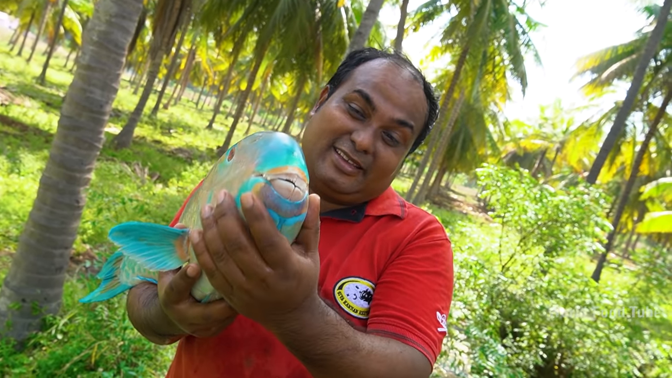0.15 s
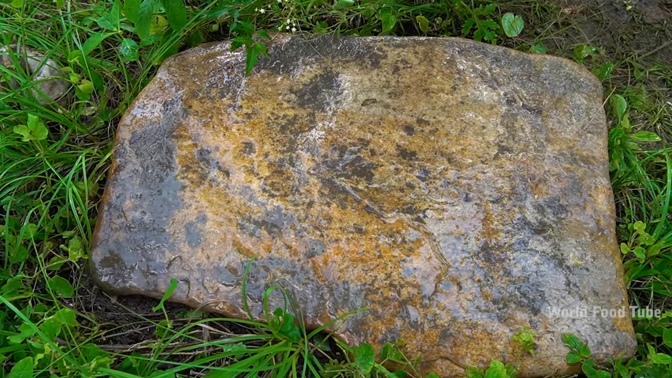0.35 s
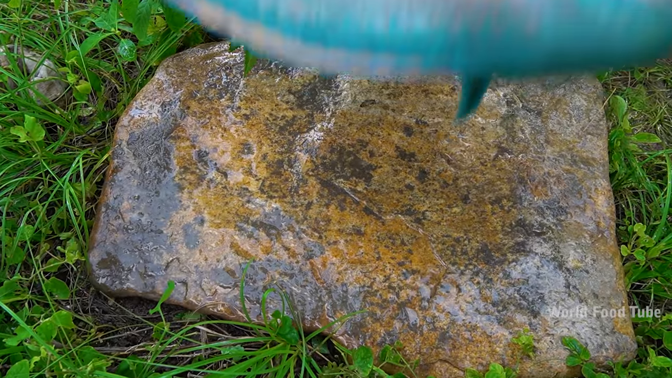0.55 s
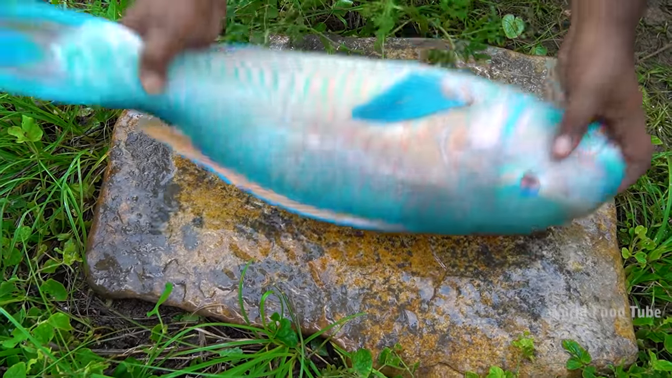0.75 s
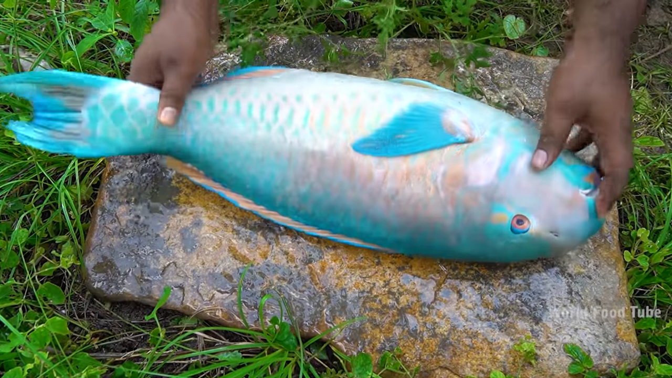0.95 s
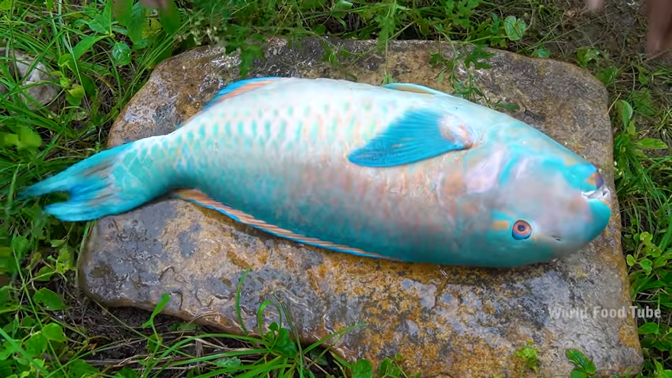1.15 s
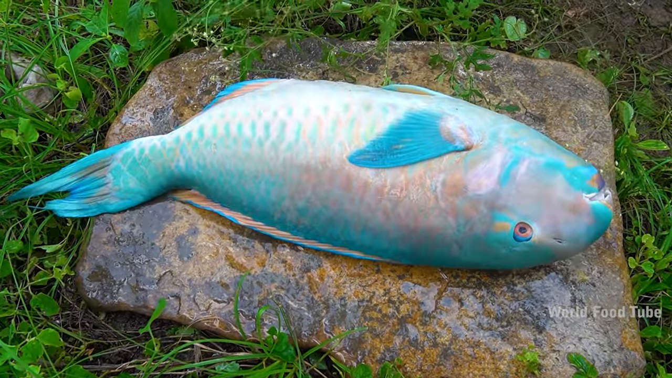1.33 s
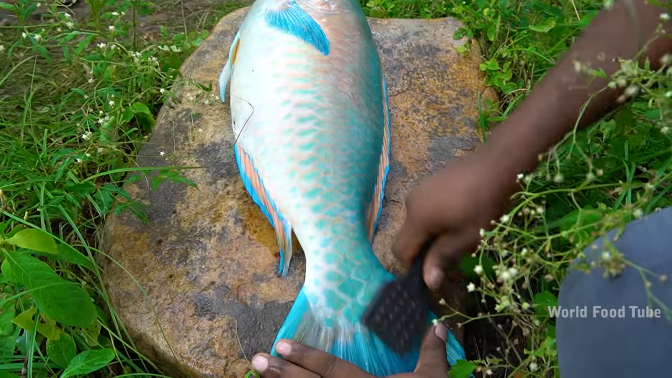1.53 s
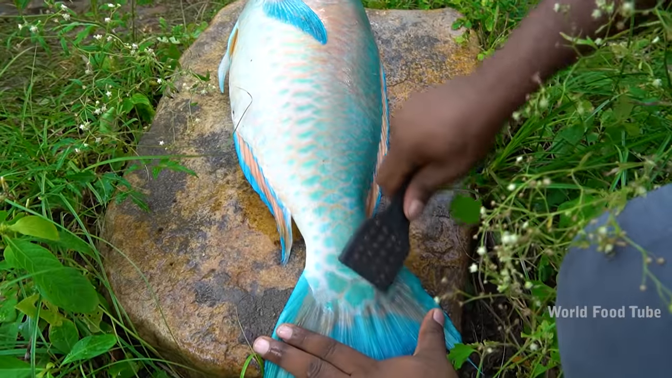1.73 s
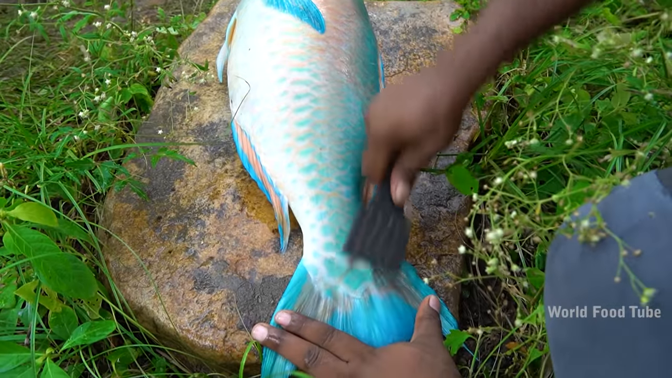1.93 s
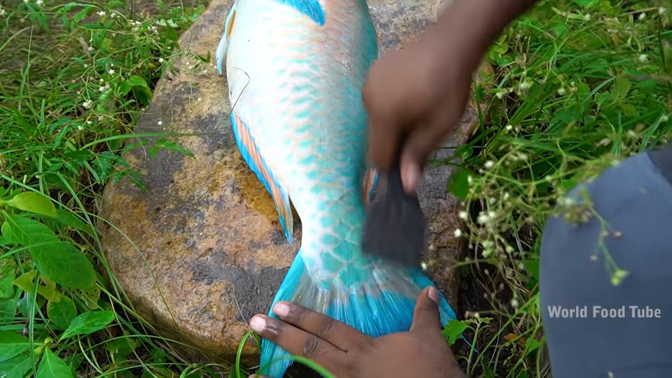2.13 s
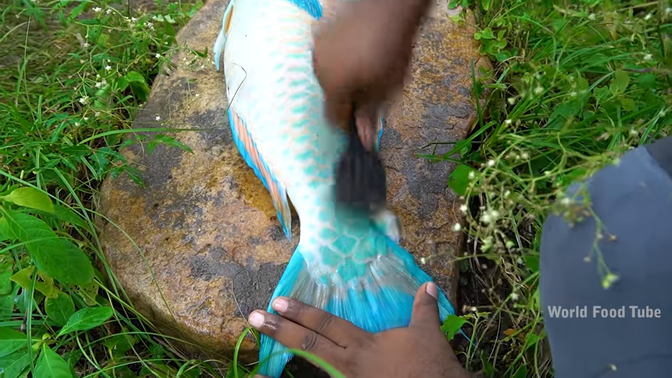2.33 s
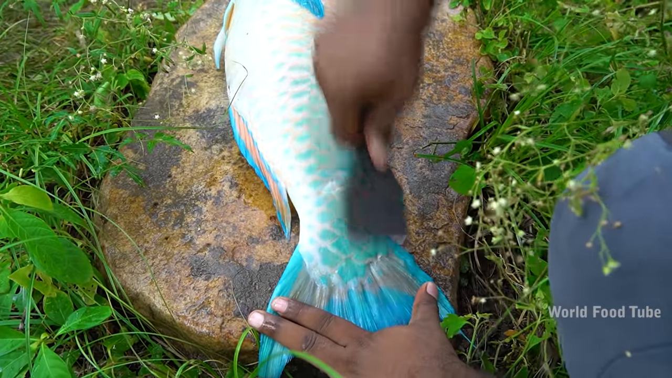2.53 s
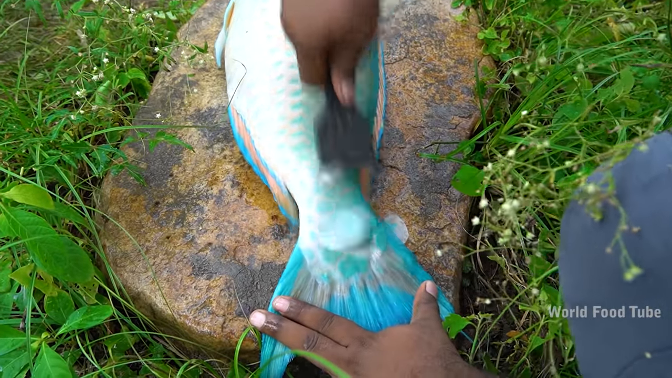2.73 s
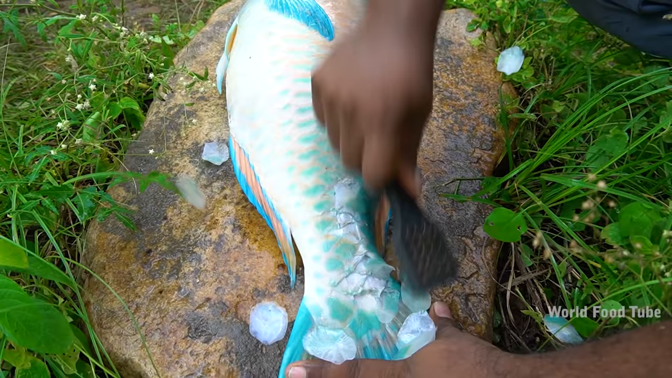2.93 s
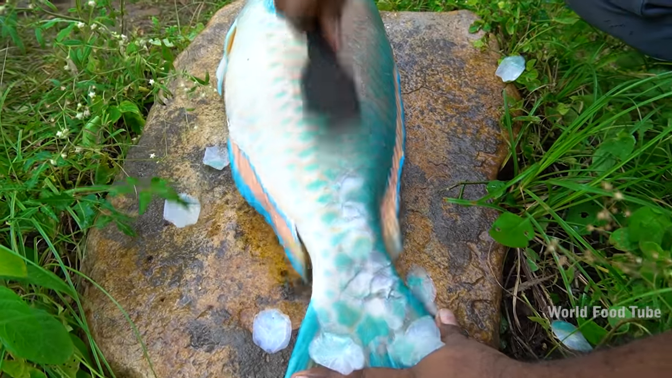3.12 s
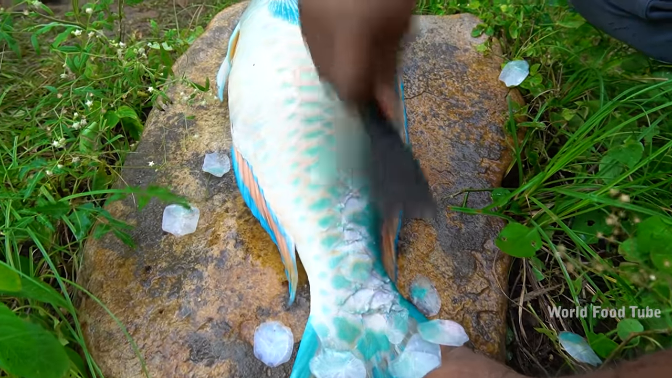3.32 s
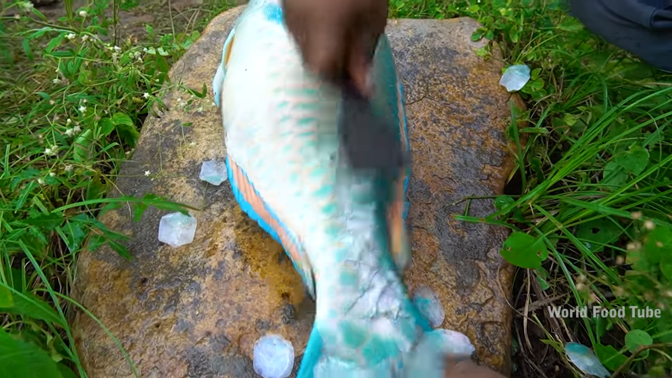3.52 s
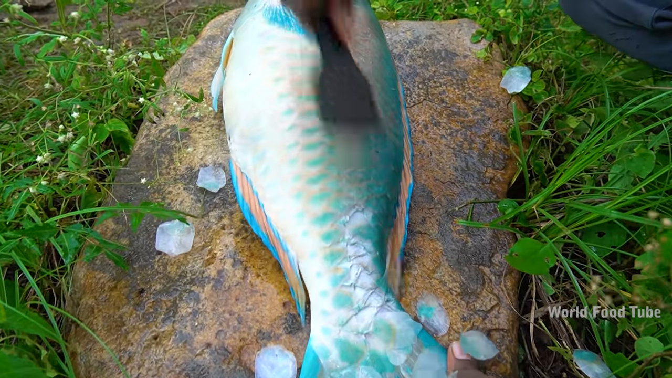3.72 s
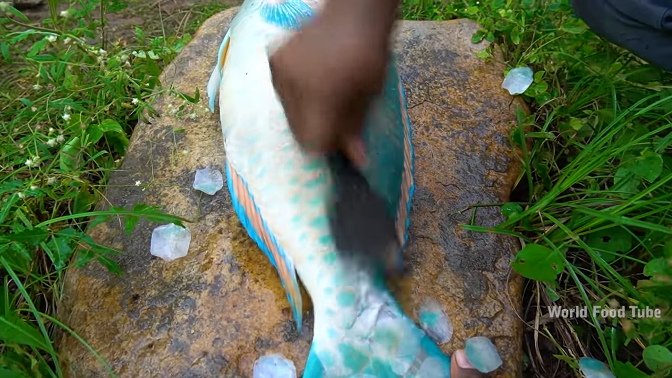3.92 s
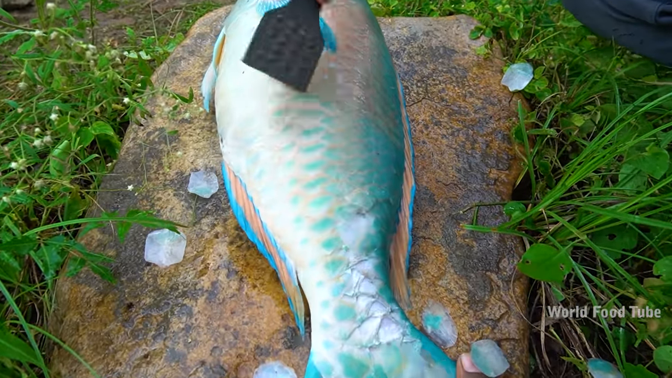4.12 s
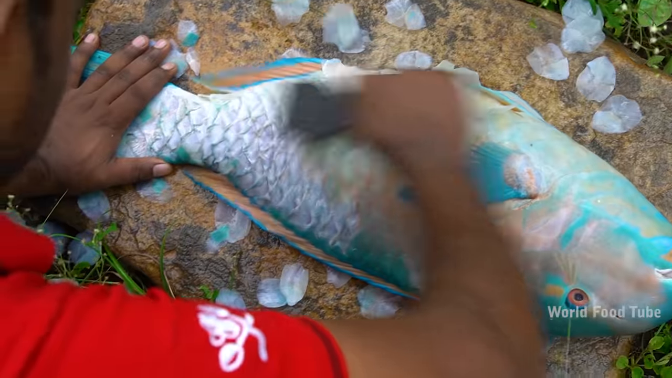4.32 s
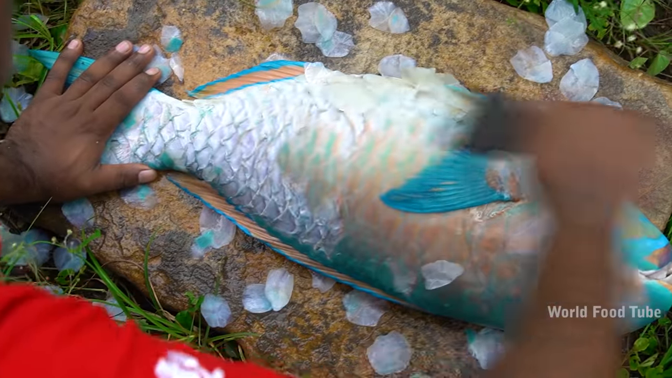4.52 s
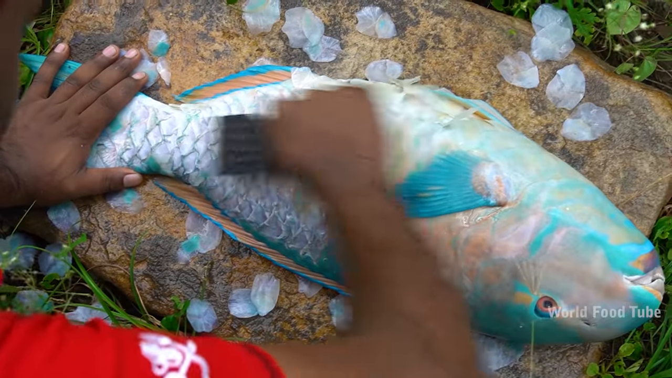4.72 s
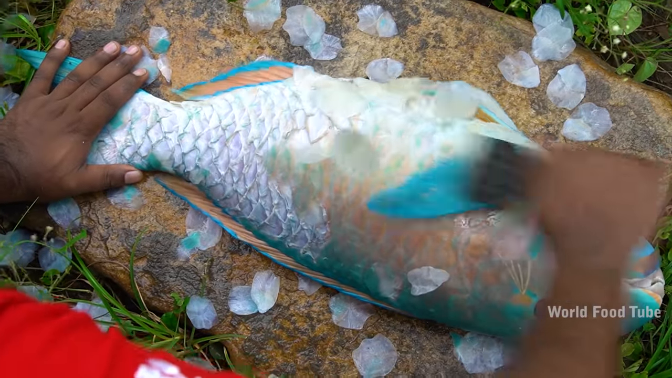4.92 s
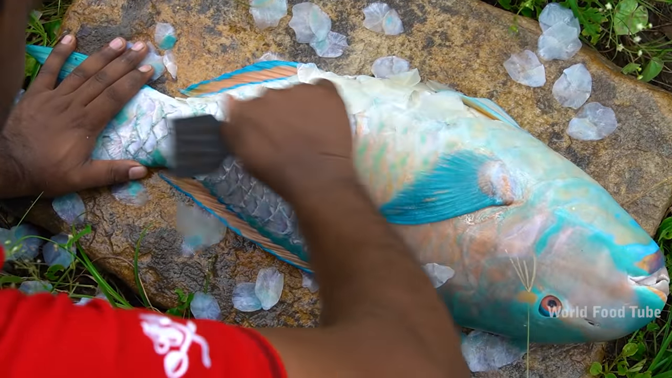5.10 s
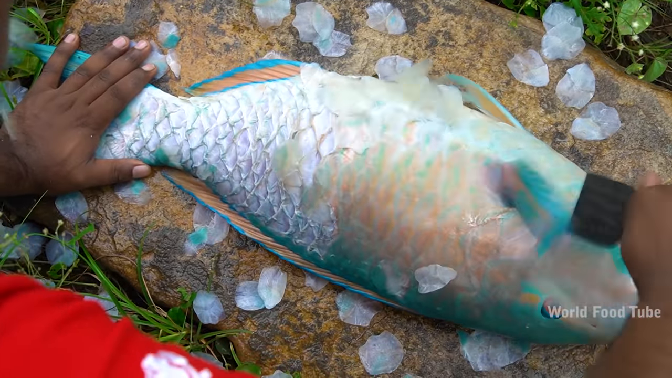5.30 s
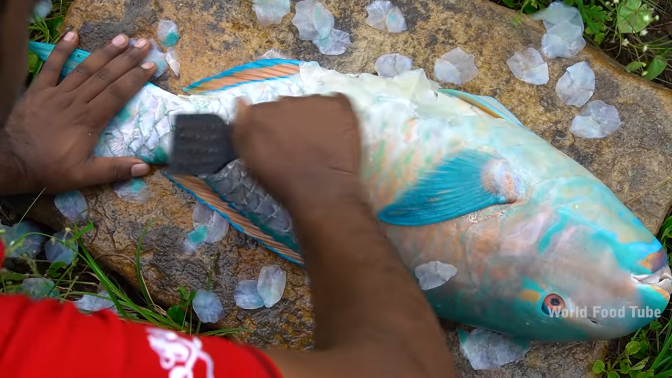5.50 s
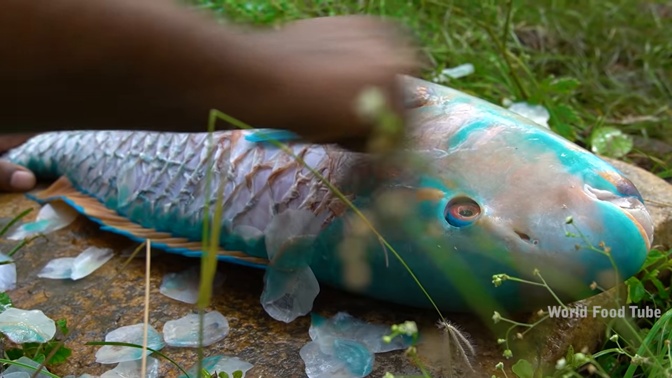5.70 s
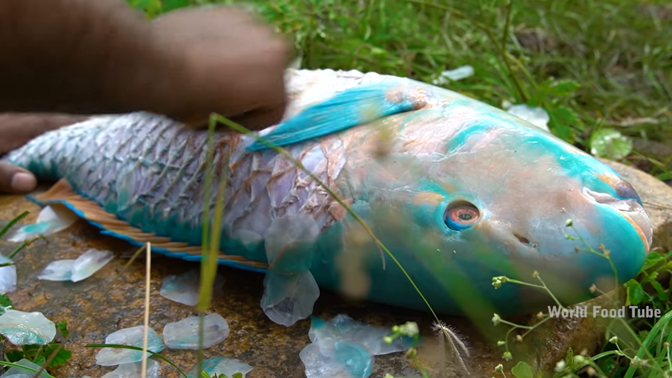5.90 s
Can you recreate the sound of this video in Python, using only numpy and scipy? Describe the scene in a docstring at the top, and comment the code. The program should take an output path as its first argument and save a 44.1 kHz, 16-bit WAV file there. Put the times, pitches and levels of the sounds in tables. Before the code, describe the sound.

Close, dry stereo sound of fish scaling in open air. After a quiet start with hissing wet rustle and a brief crisp contact on stone, rasping strokes follow at regular intervals, crunchy and bright, with wet fizz, lower fleshy scrape and hard plate-like ticks of big scales snapping loose. Small squeaks and dull body thuds come through; behind are leaves, a thin insect tone and faint gliding bird whistles.

```python
"""The soft wash of a palm grove is heard first, then a wet rustle as a large fish is lowered onto a stone slab.
A toothed metal scraper then scales the fish in strokes, each a dense run of tiny noise bursts that ring like thin plates.
Single sharp ticks are ringing bursts too, most of them big scales that snap loose or land;
short narrow resonances are scales that sing or the dull body. Behind the work, coloured noise makes the grove
and its low rumble, narrow noise makes thin far tones, and gliding sines make a bird's whistles."""
import sys
import numpy as np
from scipy import signal
from scipy.io import wavfile
from scipy.ndimage import uniform_filter1d, minimum_filter1d

SR = 44100
rng = np.random.default_rng(int(sys.argv[2]) if len(sys.argv) > 2 else 0)


def inscribe(sig):
    """Save sig as 16-bit PCM at rate SR to the path in sys.argv[1].

    A 1-D sig is mono; a 2-D sig holds one channel per row.
    Samples are clipped to [-1, 1] before scaling.
    """
    pcm = np.round(np.clip(np.atleast_2d(sig).T, -1, 1) * 32767)
    wavfile.write(sys.argv[1], SR, pcm.astype(np.int16))


N = 266893  # length of the scene in samples
HZ = np.fft.rfftfreq(2048, 1 / SR)  # frequencies at which every sound colour is set

# Strokes of the scraper; the first is the fish sliding onto the slab.
# Each row: start in seconds, dig-in in seconds, bite in seconds, run-out in seconds, stroke level in dB,
# run-out compared with bite in dB, first and last pitch of the bending scales in Hz,
# deepest push in seconds after the start, flesh at that push in dB, fizz halfway along in dB, closing thud in dB.
STROKES = [ (0.860, .004, 0.0078, 0.014, -20.5, -8, 2280, 3570, 0.0057, -5.5, -12.5, -45.5),
           (1.610, 0.021, 0.039, .012, -21.5, 1.5, 1770, 3930, .025, -17.5, -15.5, -72),
           (1.945, 0.023, 0.08, 0.04, -23.5, 3, 1970, 4140, 0.11, -6, -10, -70),
           (2.308, 0.022, 0.091, .062, -18.5, -7, 2570, 2320, 0.098, -8.5, -10, -73),
           (2.696, 0.03, 0.059, 0.1, -18, -18.5, 1640, 3000, 0.027, -8, -14.5, -78),
           (3.051, 0.048, 0.06, 0.085, -21.5, -5, 4570, 4270, 0.082, -9.5, -11.5, -66),
           (3.489, 0.06, 0.016, .112, -19, -10, 3500, 2230, .095, -12.5, -10.5, -68),
           (3.953, 0.035, 0.039, 0.039, -16.5, -9, 3600, 1900, 0.043, -17, -12.5, -67),
           (4.378, 0.039, 0.033, 0.027, -17, -7, 2100, 3280, 0.046, -6.5, -12, -48),
           (4.789, .034, 0.079, 0.0136, -17, -4.5, 2800, 2140, 0.113, -5, -12.5, -51.5),
           (5.214, 0.026, 0.079, 0.035, -20, -7, 2280, 2520, 0.038, -5, -12.5, -51),
           (5.670, 0.096, 0.011, 0.035, -22, -3, 3700, 2930, .128, -5.5, -14.5, -41), ]
# Single sharp ticks: a few in the rustle and between strokes, most of them big scales that snap loose or land.
# Each row: time in seconds, peak in dB before a small common boost, ring pitch in Hz, brightness in dB before scaling.
SNAPS = [(0.57, -28, 2170, -6), (0.713, -27, 1410, -10), (0.8683, -6, 5640, -15), (1.2116, -16, 1360, -27),
         (1.6288, -14, 1700, -40), (1.711, -10.5, 1730, -14.5), (1.803, -18.5, 1300, -15),
         (2.017, 1, 3430, -15), (2.05, -10.5, 2770, -11), (2.0947, -8.5, 4480, -11), (2.139, -21, 4700, -1),
         (2.182, -29, 1250, -17), (2.3114, -14.5, 1860, -48), (2.3559, -9, 2330, -37),
         (2.4422, -8.5, 7320, -15), (2.4556, -9, 4140, -17), (2.472, -3.5, 2460, -12.5),
         (2.6766, -17.5, 1870, -52), (2.7209, -9.5, 1520, -43), (2.7695, -10, 4840, -21),
         (2.7842, -7, 2130, -23), (2.83, -9.5, 2580, -26), (2.8453, -12.5, 2560, -12),
         (2.8733, -6.5, 2700, -20.5), (3.0014, -27, 1310, -26), (3.0623, -19.5, 2110, -17.5),
         (3.089, -13, 5130, -12), (3.1033, -3.5, 3600, -20), (3.1308, -7, 2280, -9),
         (3.179, -0.5, 2130, -12), (3.2676, -26, 5130, -18), (3.501, -22, 1630, -28),
         (3.5339, -8, 3270, -17), (3.5696, -8.5, 2120, -24), (3.5891, -7.5, 2100, -23),
         (3.6029, -8, 2190, -16.5), (3.693, -1, 3400, -11), (3.9713, -13.5, 4630, -24),
         (4.0423, -6.5, 2200, -30), (4.0524, 0, 2010, -21), (4.0841, -6.5, 1810, -24),
         (4.1122, -15.5, 1960, -12), (4.157, -24.5, 2040, -20), (4.413, -8, 2360, -20),
         (4.4704, -10, 2880, -33), (4.911, -10.5, 1770, -22), (5.182, -29, 1240, -19),
         (5.202, -24.5, 1410, -27), (5.2458, -2, 2260, -30), (5.3203, -9, 2680, -16),
         (5.3497, -15.5, 1370, -19), (5.432, -26, 1420, 3), (5.458, -7, 10500, -9),
         (5.9368, -11.5, 1620, -15.5)]
# Sound colour of the scraping. Each row: frequency in Hz, strength in dB per Hz.
RASP = [(150, -52), (250, -26.5), (298, -26), (557, -17), (816, -12.5), (1260, -7.5), (1450, -8.5),
        (1820, -6), (2050, -2.5), (3840, -2), (5250, -4.5), (5930, -8.5), (15200, -16), (16000, -46)]
# Stereo width of the scraping. Each row: frequency in Hz, side compared with middle in dB.
WIDTH = [(200, -10), (1000, -39), (2000, -16.5), (4000, -7), (8000, -7), (15000, -6)]


def amp(db):
    """Turns decibels into a gain."""
    return 10 ** (np.asarray(db) / 20)


def unit(x):
    """Scales a sound to an rms (average strength) of one."""
    return x / np.sqrt(np.mean(x ** 2) + 1e-20)


def ramp(t, start, length):
    """Goes evenly from zero to one."""
    return np.clip((t - start) / length, 0, 1)


def read(points, hz):
    """Reads a curve between its points on a log-frequency axis."""
    f, value = np.transpose(points)
    return np.interp(np.log(hz + 1), np.log(f + 1), value)


def add(mix, s, sound):
    """Mixes a sound in at time s in seconds."""
    part = mix[:, max(round(s * SR), 0):][:, :sound.shape[-1]]
    part += sound[..., :part.shape[1]]


def colour(x, db):
    """Filters a sound with the gains db at the frequencies HZ, with no sound ahead of its cause."""
    log_gain = np.log(amp(np.maximum(db, db.max() - 100)))
    both_halves = np.r_[log_gain, log_gain[-2:0:-1]]
    # the Hilbert transform gives the minimum phase that belongs to these gains
    spectrum = np.exp(np.conj(signal.hilbert(both_halves)))
    taps = np.fft.ifft(spectrum).real
    return signal.fftconvolve(x, taps[:len(HZ)])[:len(x)]


def band(x, lo_hz, hi_hz):
    """Keeps only a band of frequencies, with steep edges."""
    edges = [lo_hz, min(hi_hz, .49 * SR)]
    return signal.sosfilt(signal.butter(4, edges, "band", fs=SR, output="sos"), x)


def resonate(x, hz, width):
    """A resonance with a gain of one at its pitch, which may glide; width in Hz."""
    turn = np.exp(2j * np.pi * np.cumsum(hz * np.ones(x.shape[-1])) / SR)
    r = np.exp(-np.pi * width / SR)
    # shift the pitch down to zero, smooth there, and shift back up
    smooth = signal.lfilter([1 - r], [1, -r], x / turn + 1e-18)
    return 2 * (turn * smooth).real


def narrow(n, hz, width):
    """A fuzzy tone of rms one: n samples of noise through the same resonance twice."""
    noise = rng.standard_normal(n + SR // 10)  # the extra start lets the resonance build up
    return unit(resonate(resonate(noise, hz, width), hz, width)[-n:])


def rings(table, width):
    """Short swells of one resonance each, from rows of (s, rms dB, pitch Hz, length s)."""
    out = np.zeros((2, N))
    for s, db, hz, length in table:
        n = round(length * SR)
        swell = signal.windows.tukey(n, .8) * narrow(n, hz, width)
        add(out, s, amp(db) * unit(swell))
    return out


def spread(pair, db, width):
    """Colours a middle and a side signal and turns them into left and right."""
    mid = colour(pair[0], db)
    side = colour(pair[1], db + read(width, HZ))
    return np.array([mid + side, mid - side])


def strokes():
    """The scraper ploughs through the scales; the flesh answers lower down and wet slime fizzes on top."""
    touch_db = -23  # first touch of the teeth, compared with the bite
    ease_s = 0.0054  # the hand eases from the bite into the run-out
    lift_s, lift_db = .011, -20.5  # the scraper leaves the skin
    # flung slime patters on, thinner and brighter
    spray_s, spray_fade_db, spray_fizz_db = 0.064, -14.5, 3.5
    fizz_rise_db = 11.5  # slime gathers on the teeth along the stroke
    fizz_keep = 0.24  # share of the change in force that the fizz does not follow in the run-out
    push_s, flesh_rest_db = 0.015, -8.5  # half width of the deepest push; change in the flesh away from it
    loose_db = 8  # level of the smaller loose scales

    out = np.zeros((2, N))
    grains = crackle(per_s=2000, size_db=4.0, decay=0.00091, ring_db=20.5, sharpness=13.3)
    slime = unit(spread(rng.standard_normal((2, N)), read(RASP, HZ), WIDTH))
    rasp = unit(band(grains, 1666, 7800))
    flesh = unit(band(grains, 396, 1360))
    fizz = unit(band(grains + amp(-11.5) * slime, 6620, 20800))
    pops = amp(loose_db) * loose_scales()
    for start, dig, bite, run_out, db, light_db, first_hz, last_hz, push, flesh_db, fizz_db, _ in STROKES:
        ease = dig + bite
        lift = ease + run_out
        t = np.arange(0, lift + lift_s + spray_s, 1 / SR)
        at = round(start * SR) + np.arange(len(t))

        # force: dig in, bite, run out, lift off, spray
        lifted = ramp(t, lift, lift_s)
        eased_db = light_db * ramp(t, ease, ease_s)
        digging_db = touch_db * (1 - ramp(t, 0, dig))
        spray_db = spray_fade_db * ramp(t, lift + lift_s, spray_s)
        force_db = digging_db + eased_db + lift_db * lifted + spray_db

        # the pitch of the bending scales glides along the stroke
        along = ramp(t, 0, lift)
        hz = first_hz * (last_hz / first_hz) ** along
        bending = unit(rasp[:, at] + amp(1.0) * resonate(rasp[:, at], hz, 840))

        away_from_push = 1 - np.exp(-((t - push) / push_s) ** 2)
        give = amp(flesh_db + flesh_rest_db * away_from_push)
        wet = amp(fizz_db + fizz_rise_db * (along - .5) - fizz_keep * eased_db + spray_fizz_db * lifted)
        sound = amp(-2.0) * bending + pops[:, at] + give * flesh[:, at] + wet * fizz[:, at]
        add(out, start, amp(db + force_db) * sound * signal.windows.tukey(len(at), .04))
    return out


def crackle(per_s, size_db, decay, ring_db, sharpness, count=36):
    """A dense run of cracks from scales of many sizes, evened to a steady strength."""
    out = np.zeros((2, N))
    for hz in np.geomspace(1500, 6000, count):
        happens = rng.random(N) < per_s / count / SR
        clicks = happens * amp(size_db * np.minimum(rng.exponential(1, N), 4))
        grain = crack(hz, decay * rng.uniform(0.87, 2.7), ring_db, sharpness, tilt_db=1.8 * rng.standard_normal())
        out += signal.oaconvolve(clicks[None], unit(grain), axes=1)[:, :N]
    power = abs(uniform_filter1d((out ** 2).mean(0), size=700))
    return out / np.sqrt(power + 1e-9)


def crack(hz, decay, ring_db, sharpness, tilt_db):
    """A brief noise burst rings a thin plate, as when one scale lets go; decay in seconds."""
    t = np.arange(1024) / SR
    envelope = np.exp(-t / decay) * (1 - np.exp(-t / 0.00025))
    burst = rng.standard_normal((2, len(t))) * envelope
    off_pitch = sharpness * (HZ / hz - hz / (HZ + 1))
    ring = 10 * np.log10(1 + amp(ring_db) ** 2 / (1 + off_pitch ** 2))
    treble = tilt_db * read([(3500, 0.12), (9000, 0.88)], HZ)
    return spread(burst, read(RASP, HZ) + ring + treble, WIDTH)


def loose_scales():
    """Smaller scales pop at random under the scraper, with peaks spread over 6 dB."""
    loose_per_s = 35
    out = np.zeros((2, N))
    for when, pitch, size in rng.random((round(loose_per_s * N / SR), 3)):
        pop = crack(1700 * 3 ** pitch, .0003, ring_db=19, sharpness=7.8, tilt_db=6)
        add(out, when * N / SR, amp(-6 * size) * pop / abs(pop).max())
    return out


def skips():
    """The teeth skip after a snap: a gain that dips the strokes just after each tick, more after a louder one."""
    skip_db = -4.5  # depth after a tick listed at 0 dB
    skip_after_s, skip_s = 0.015, 0.0097  # delay and half width of the dip
    after = np.arange(0, skip_after_s + 3 * skip_s, 1 / SR)
    dip = np.exp(-((after - skip_after_s) / skip_s) ** 2)
    dips = np.zeros((1, N))
    for s, db, *_ in SNAPS:
        add(dips, s, amp(db / 2) * dip)
    return amp(skip_db * dips)


def snaps():
    """Single sharp ticks, most of them big scales breaking free; the higher the ring, the shorter the crack."""
    out = np.zeros((2, N))
    for s, db, hz, bright_db in SNAPS:
        decay = 0.0023 * (2500 / hz) ** 0.67
        snap = crack(hz, decay, ring_db=12, sharpness=4.2, tilt_db=0.83 * (bright_db + 22.5))
        add(out, s + .0008, amp(db + 1.0) * snap / abs(snap).max())
    return out


def squeaks():
    """Scales that stick and sing under a tooth, each a short narrow resonance."""
    # Each row: start in seconds, rms level in dB, pitch in Hz, length in seconds.
    squeak_rows = [(1.644, -16, 1750, 0.0095), (1.678, -22.5, 4000, 0.015), (1.958, -18, 1740, 0.017),
                   (2.68, -31.5, 1790, .006), (2.713, -27, 1560, .025), (3.146, -25.5, 4940, .014),
                   (3.19, -36, 2120, 0.057), (3.212, -25, 4080, 0.015), (3.578, -33, 2090, 0.044),
                   (3.703, -39, 3880, 0.022), (5.3, -21.5, 2230, .018), (5.693, -35, 3700, .02)]
    return rings(squeak_rows, width=280)


def surroundings(x, near_t60, far_t60, near_db, far_db):
    """Slab, ground and the worker's body scatter the sound at once; the trunks add a faint tail."""
    t = np.arange(SR // 2) / SR
    taps = rng.standard_normal((2, len(t))) * (rng.random((2, len(t))) < .15) * (t > .002)
    echo = 0
    for t60, db in ((near_t60, near_db), (far_t60, far_db)):
        tail = taps * amp(-60 * t / t60)  # t60: seconds to fade by 60 dB
        echo = echo + amp(db) * tail / np.linalg.norm(tail[0])
    return x + signal.fftconvolve(x, echo, axes=1)[:, :N]


def body_knocks():
    """The fish's body resonates dully, jolted late in each stroke and bumped between or after strokes."""
    # Bumps outside the strokes. Each row: start in seconds, rms level in dB, pitch in Hz, length in seconds.
    bump_rows = [(2.998, -63, 110, 0.021), (5.924, -43.5, 224, 0.032)]
    return rings(thuds() + bump_rows, width=135)


def thuds():
    """Each stroke jolts the body just before the scraper lifts: rows of (s, rms dB, pitch Hz, length s)."""
    thud_hz, longest_s, lead_s = 229, .11, .085
    rows = []
    for start, dig, bite, run_out, *_, db in STROKES:
        lift = dig + bite + run_out
        rows.append((start + max(lift - lead_s, 0), db, thud_hz, min(longest_s, lift)))
    return rows


def rustle():
    """Wet hands and grass rustle as the fish is lowered: fine ticks roughen a hiss that fades to a remainder."""
    start_s, peak_s = 0.393, 0.79
    peak_db, rest_db = -42.5, -61
    swell_db_per_s, fade_db_per_s = 24, 41
    flutter_db = 2  # the rustle comes in clumps of some 20 ms

    ticks = (rng.random(N) < 500 / SR) * amp(5.9 * np.minimum(rng.exponential(1, N), 4))
    tick_tails = signal.lfilter([1], [1, -np.exp(-1 / (0.00083 * SR))], ticks)
    hiss = rng.standard_normal((2, N)) * (1 + 0.48 * tick_tails)
    hiss_db = read([(800, -16), (3000, -5), (6000, 0), (10000, -2.5), (16000, -4.0)], HZ)
    sound = unit(spread(hiss, hiss_db, WIDTH))
    t = np.arange(N) / SR
    swell_db = peak_db + np.minimum(swell_db_per_s * (t - peak_s), fade_db_per_s * (peak_s - t))
    clumps_db = flutter_db * unit(uniform_filter1d(rng.standard_normal(N), size=900))
    return sound * ramp(t, start_s, .01) * np.hypot(amp(swell_db + clumps_db), amp(rest_db))


def grove():
    """Leaves and far-off life: a softly wavering wash of noise over a low rumble."""
    # Sound colour. Each row: frequency in Hz, strength in dB per Hz.
    wash_colour = [(18, -37), (30, -37.5), (105, -20), (170, -22), (415, -16.5), (473, -11.5), (569, -8),
                   (1220, -3), (1350, -0.5), (1630, -6.5), (2230, -6.5), (3220, -13), (3770, -16.5),
                   (6550, -27), (13700, -45), (16000, -39)]
    # Stereo width. Each row: frequency in Hz, side compared with middle in dB.
    wash_width = [(60, -25), (240, -17.5), (950, -7), (3770, -1), (15000, 3.5)]
    # Stretches of the background. Each row: start in seconds, level in dB, drift in dB per second,
    # extra rumble in dB, left compared with right in dB (for the sound above the rumble).
    stretches = [(0, -44.5, 5, -17, 4), (.4, -38.6, -0.7, 4, 2.5), (1.6, -39.5, -3, 4.5, -1),
                 (2.45, -44.5, -2, 1.5, -0.5), (4.269, -38.5, -0.64, -1, 3), (5.6, -40.5, 1, 6, 1)]

    t = np.arange(N) / SR
    rows = np.array(stretches)
    start, level_db, drift, rumble_db, pan_db = rows[np.searchsorted(rows[1:, 0], t)].T
    db = uniform_filter1d(level_db + drift * (t - start), size=600)
    wash = unit(spread(rng.standard_normal((2, N)), read(wash_colour, HZ), wash_width))
    rumble = signal.sosfiltfilt(signal.butter(2, 190, fs=SR, output="sos"), wash)
    waver = unit(sum(np.sin(2 * np.pi * (f * t + rng.random())) / np.sqrt(f) for f in np.geomspace(2, 30, 20)))
    panned = (wash - rumble) * amp([pan_db / 2, -pan_db / 2])
    return amp(db + .5 * waver) * (panned + amp(rumble_db) * rumble)


def background_swells():
    """The background swells briefly a few times, each a broad resonance of noise."""
    # Each row: start in seconds, rms level in dB, pitch in Hz, length in seconds.
    swell_rows = [(.04, -51, 2000, .14), (.26, -44.5, 1800, 0.036), (4.262, -41.5, 1380, 0.086),
                  (4.755, -36.5, 1400, 0.032)]
    return rings(swell_rows, width=870)


def far_tones():
    """Thin steady tones, perhaps insects: noise through a narrow resonance."""
    # Each row: start in seconds, end in seconds, pitch in Hz, width in Hz, level in dB.
    tone_rows = [(0.702, 2.3, 1392, 60, -59), (4.27, 5.8, 1390, 70, -48)]
    out = np.zeros((2, N))
    for start, end, hz, width, db in tone_rows:
        n = round((end - start) * SR)
        add(out, start, amp(db) * narrow(n, hz, width) * signal.windows.tukey(n, .2))
    return out


def bird_whistles():
    """A bird's gliding whistles: a sine with a second harmonic and fuzz, the blur of the trees."""
    # Each row: start in seconds, end in seconds, first pitch in Hz, last pitch in Hz, level in dB.
    whistle_rows = [(0.395, 0.432, 4860, 4770, -46.5), (.68, .87, 3530, 3610, -53),
                    (1.12, 1.34, 3440, 3495, -53.5), (4.95, 5.11, 4630, 3030, -49.5)]
    octave_db, fuzz_db = -19, -8
    out = np.zeros((2, N))
    for start, end, first_hz, last_hz, db in whistle_rows:
        n = round((end - start) * SR)
        hz = np.linspace(first_hz, last_hz, n)
        phase = 2 * np.pi * np.cumsum(hz) / SR
        fuzz = unit(resonate(rng.standard_normal(n), hz, 120))
        whistle = np.sin(phase) + amp(octave_db) * np.sin(2 * phase) + amp(fuzz_db) * fuzz
        add(out, start, amp(db) * unit(whistle) * signal.windows.tukey(n, .2))
    return out


def scene():
    """The scraping sounds a little right of centre, with the grove all round."""
    # Where the work sounds. Each row: time in seconds, left compared with right in dB.
    work_pan = [(.9, -2), (1.7, -3.4), (4.1, -3.2), (4.4, -2), (5.8, -1.2)]
    pan_db = np.interp(np.arange(N) / SR, *np.transpose(work_pan))
    scales = strokes() * skips() + snaps() + squeaks()
    work = surroundings(scales, near_t60=0.079, far_t60=1.0, near_db=-13, far_db=-27.5)
    work = work * amp([pan_db / 2, -pan_db / 2])
    background = grove() + background_swells() + far_tones() + bird_whistles()
    return work + body_knocks() + rustle() + background


def record(dry):
    """A fast limiter holds the sharpest cracks down; then a low-pass takes off the very top."""
    ceiling, edge_hz = 0.63, 16200
    room_left = ceiling / np.maximum(abs(dry).max(0), ceiling)
    gain = uniform_filter1d(minimum_filter1d(room_left, size=91), size=91)
    low_pass = signal.firwin(401, edge_hz, window=("kaiser", 9), fs=SR)
    return signal.oaconvolve(dry * gain, low_pass[None], "same")


dry = scene()
out = record(dry)
inscribe(out)
```